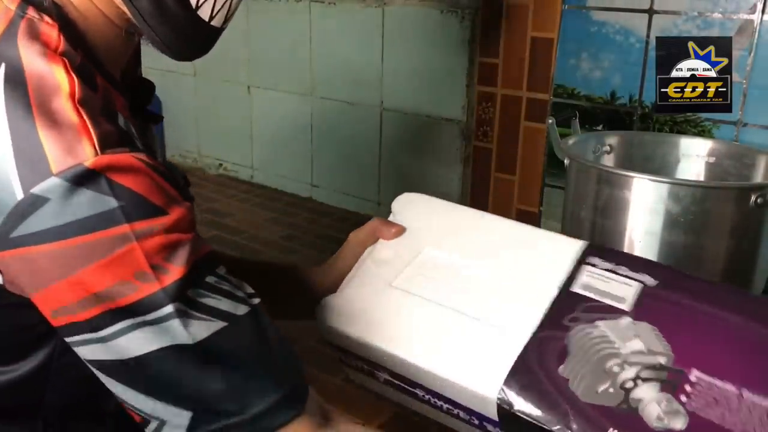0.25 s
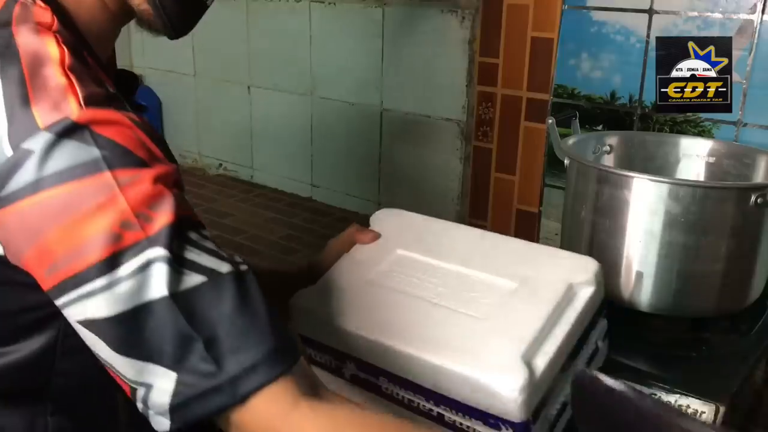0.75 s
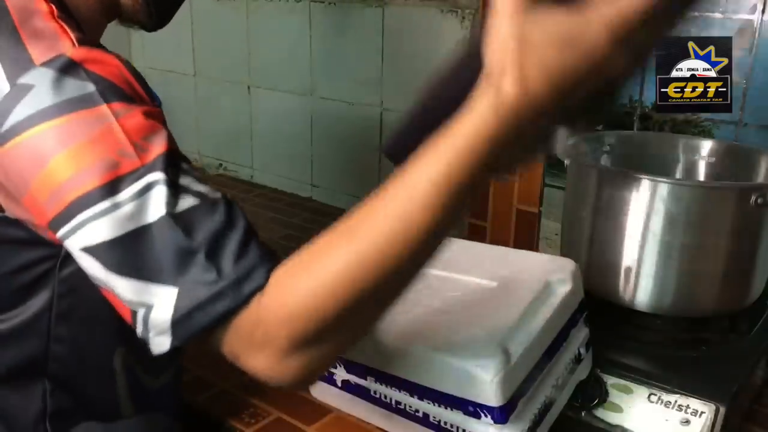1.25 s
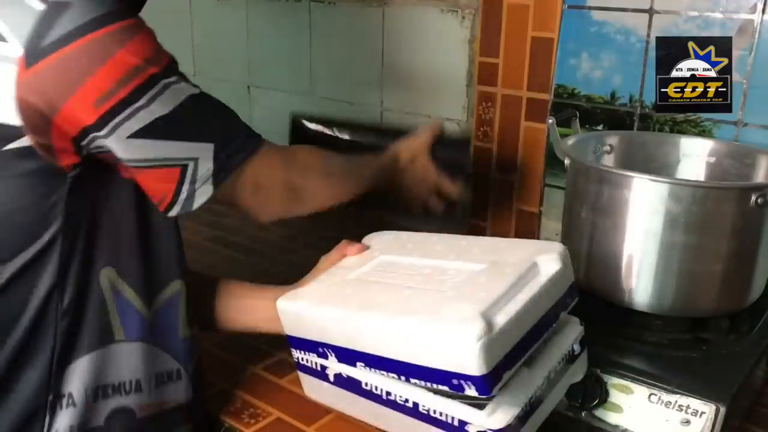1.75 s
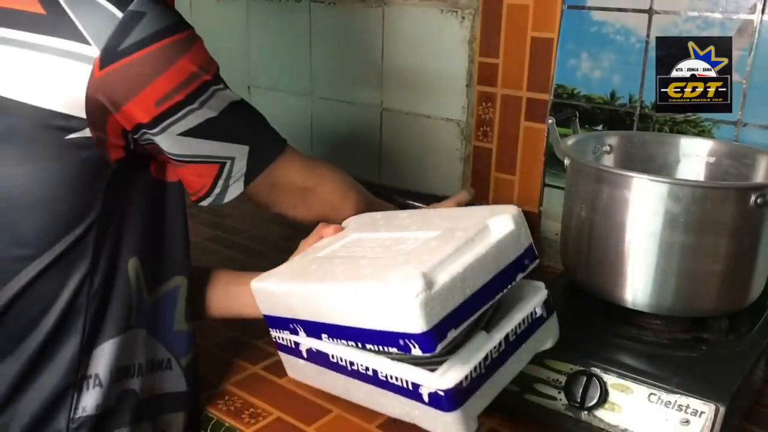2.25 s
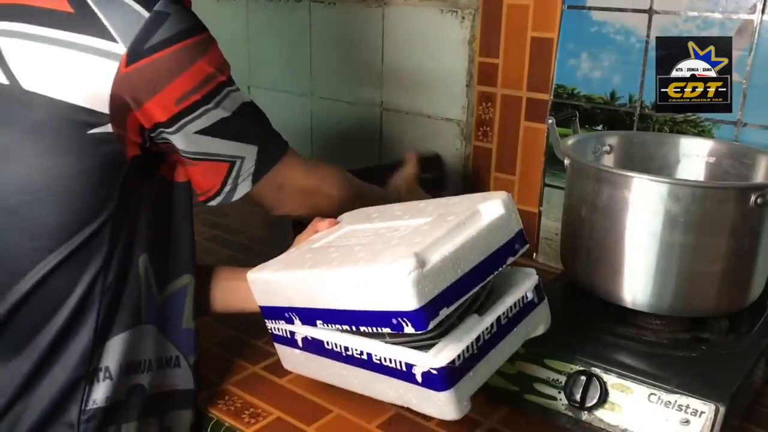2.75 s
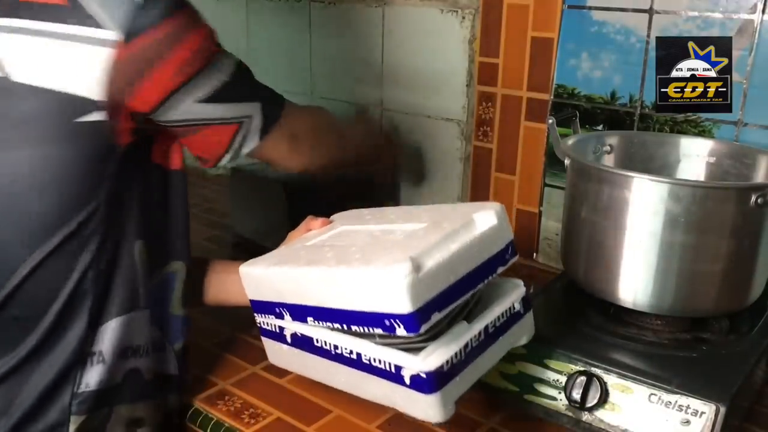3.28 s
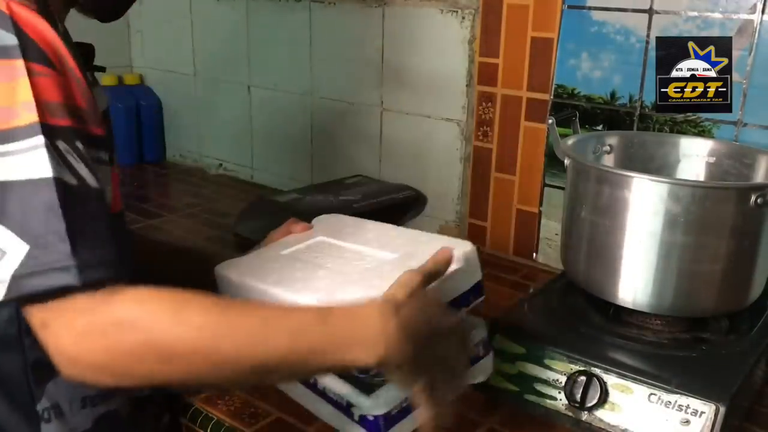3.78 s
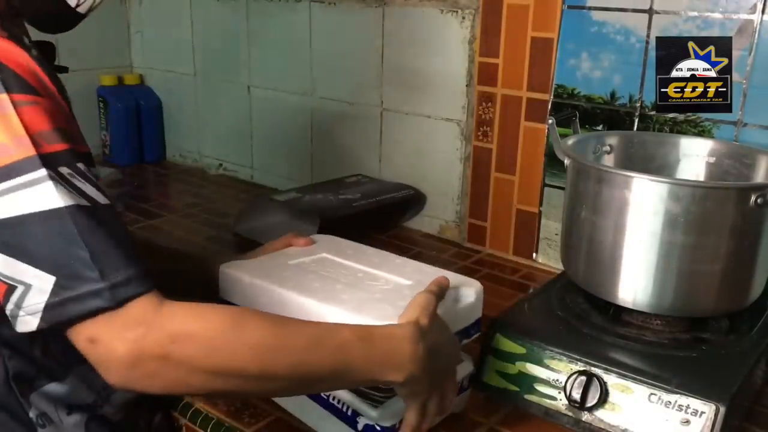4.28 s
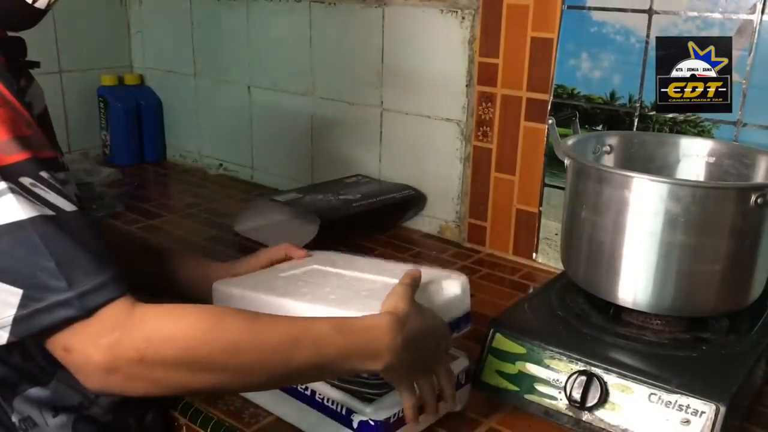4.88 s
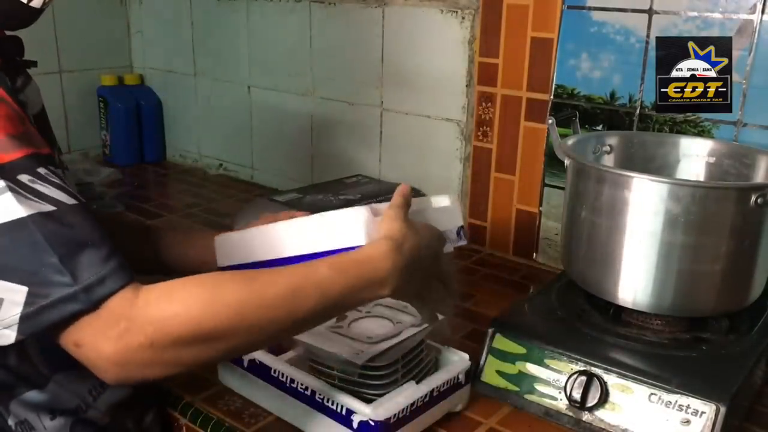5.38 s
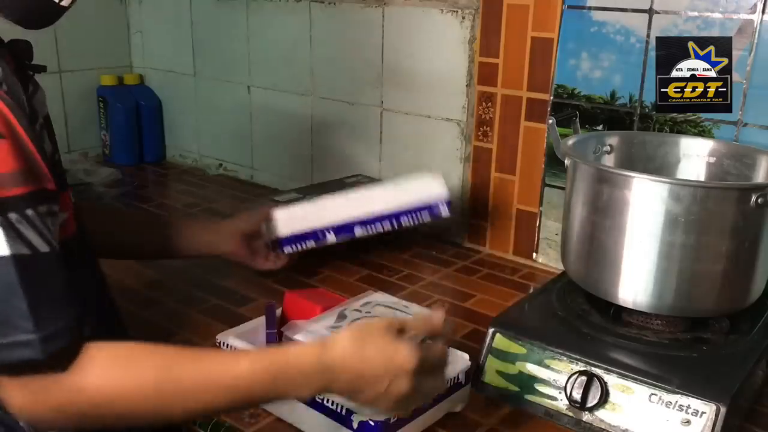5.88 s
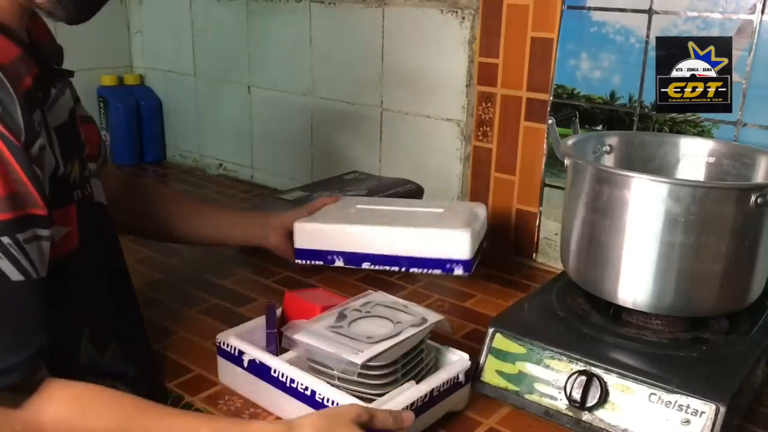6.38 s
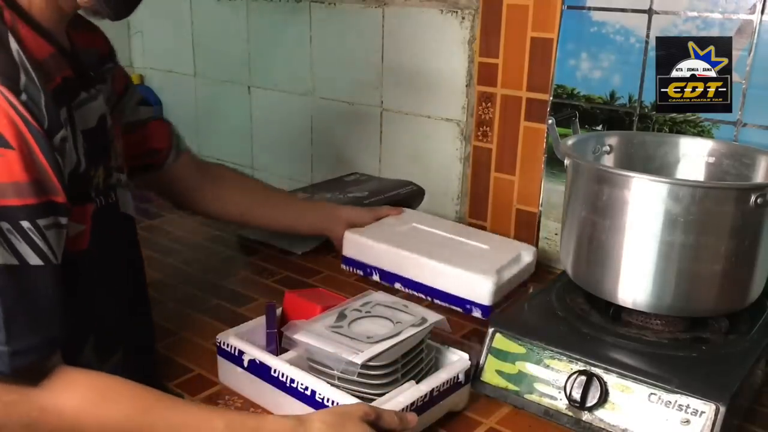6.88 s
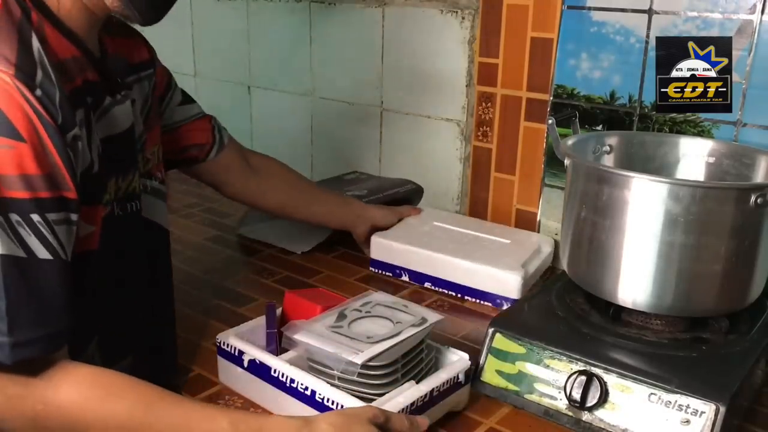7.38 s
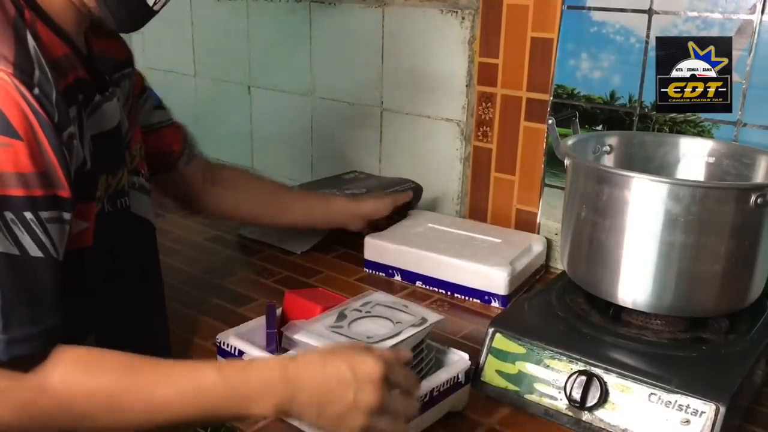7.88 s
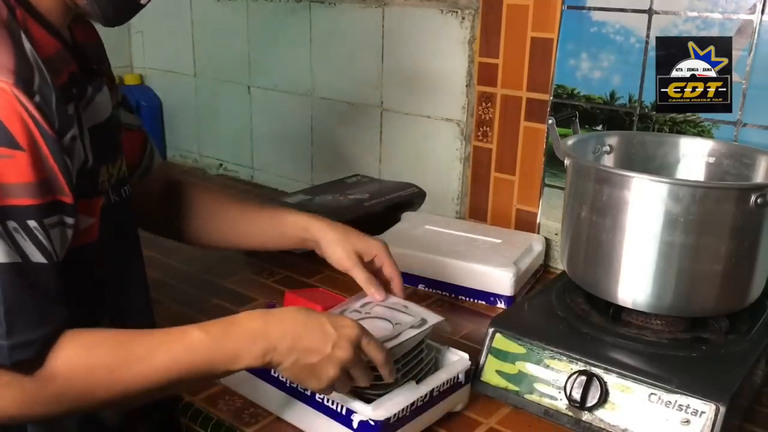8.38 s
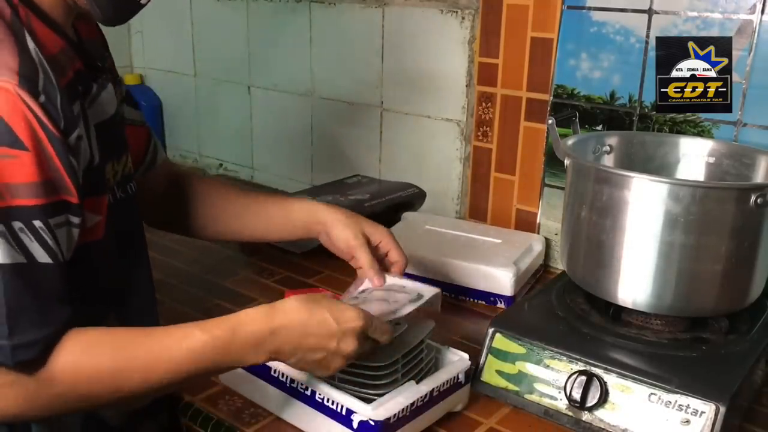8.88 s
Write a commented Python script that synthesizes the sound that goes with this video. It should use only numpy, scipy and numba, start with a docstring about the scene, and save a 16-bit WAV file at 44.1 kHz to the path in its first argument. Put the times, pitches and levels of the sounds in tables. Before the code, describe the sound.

In a quiet little kitchen, close to a phone, polystyrene rubs along card with fine hissing grit. Hollow knocks and low counter thumps follow as things are put down and shifted. Quick ticking creaks build into several hard, crisp cracks with squeaky foam rubbing, then a near lull. Later come scuffs, a few boxy knocks and faint handling rustle, with a short tiled reverberation.

```python
"""Foam box out of its sleeve

A foam box is drawn out of its card sleeve on a tiled counter; the sleeve is dropped, the taped lid worked loose and set down.
Noisy micro-slips, shaped by body, wall and hiss filters, make the sliding, rustling, cracks, snaps, scuffs and knocks.
Slow low noise and fading sine waves shake the counter; soft noise and faint tones fill a small quiet kitchen, heard by a phone."""
import sys
import numpy as np
from scipy import signal
from scipy.fft import rfft, irfft, next_fast_len
from scipy.io import wavfile
from scipy.ndimage import uniform_filter1d
from numba import njit

SR = 44100
rng = np.random.default_rng(int(sys.argv[2]) if len(sys.argv) > 2 else 0)


def store_pcm(level_fs):
    """Save levels as 16-bit WAV."""
    pcm = np.round(np.clip(level_fs, -1, 1) * 32767).astype(np.int16)
    wavfile.write(sys.argv[1], SR, np.atleast_2d(pcm).T)


N = 402879  # length in samples

# bending modes of the foam walls: (f/Hz, width/Hz, level/dB)
WALLS = [(972, 10, 2.5), (1200, 16, -3.5), (1450, 13, -7.5), (1770, 16, -7), (2070, 170, -9),
         (2472, 60, -4), (2920, 130, -5), (3430, 62, -3.5), (4067, 94, -6.5), (4520, 55, -2),
         (5840, 76, -3.5), (6820, 50, -3.5)]
# colour of the open hiss: (f/Hz, level/dB)
HISS = [(2940, -24.5), (5000, 0.5), (7060, -1.5), (8580, -5.5), (12100, -8.5), (14600, -17), (16000, -31)]
BRIGHT_HZ = (3490, 4680)  # broad bright band of the foam walls: centre, width


def sliding():
    """Foam slides on card: fine, even grit with little flicker."""
    # (t/s, wall level/dB, then against the wall: hollow body level/dB, hiss level/dB)
    slide = [(0.0, -37, -14, 3), (0.034, -55.5, -18, -0.5), (0.092, -72, 5, -1), (0.19, -70.5, -2, -9.5),
             (0.222, -53, -1, 3.5), (0.342, -46.5, -9, 0.5), (0.518, -44, -12, 3.5), (0.6, -40.5, -5.5, 3),
             (0.672, -54.5, -3, -5.5), (0.736, -50.5, 3.5, -16), (0.79, -68, -3, -15)]
    return rub(slide, body_hz=500, bright_db=1, grain_db=0.1, flicker_db=1.1, roam_db=3.0)


def rustling():
    """Hands and sleeves move over foam and card: coarser grit that flickers and roams more."""
    # (t/s, wall level/dB, then against the wall: hollow body level/dB, hiss level/dB)
    rustle = [(0.8, -64.5, -1, -37), (1.05, -71, 4.5, -23), (1.87, -72, 3, -11), (2.31, -80.5, -5, -7.5),
              (2.68, -77, 6.5, -9.5), (2.96, -67.5, 6, -11), (3.19, -69, 2, -3), (3.33, -50, -1.5, -22),
              (3.65, -71.5, 3, -13), (4.07, -69, -0.5, -5.5), (4.44, -50, -7, -14), (4.95, -51, -3.5, -7.5),
              (5.25, -73, -0.5, -12.5), (5.44, -78.5, -0.5, -9.5), (5.77, -69.5, -6, -11),
              (6.0, -82.5, -5.5, -2), (6.62, -71, 3.5, -13), (7.09, -64.5, 6, -8), (7.44, -72.5, 2.5, -4),
              (7.82, -62.5, 8, -10), (8.07, -80, 4, -11.5), (8.67, -71.5, 5.5, -11), (8.83, -81, 3.5, -9),
              (9.14, -79, -1.5, -3.5)]
    return rub(rustle, body_hz=480, bright_db=-4.5, grain_db=2.5, flicker_db=2.65, roam_db=6.5)


def tape_cracks():
    """The lid's tape lets go: very fast bursts with a strong tick and a sharp hiss."""
    # (t/s, wall level/dB, then against the wall: hollow body level/dB, bright level/dB, hiss level/dB;
    #  body f/Hz, t60/s, extra tick level/dB)
    cracks = [(4.4323, -17, -10, -0.5, -6.5, 495, .13, 5), (4.6195, -28.5, -4, 0.5, -6, 496, .29, -3),
              (4.6392, -18.5, -9, 2.5, -7.5, 666, 0.2, 12), (4.7545, -32, -5, 2.5, -2.5, 557, 0.15, -1),
              (4.784, -29, -10, 2, -4, 460, 0.095, 3)]
    return contacts(cracks, rise=0.0013, hold=0.016, spread=0.59, tick_db=1, tick_t60=0.02, blow=3.9,
                    grain_db=0.5, lead=0.27, late_s=0.004, linger=(0.9, 1.1, 0.9), touch_db=2.5,
                    wall_hz=1560, edge_db=5.5)


def knocks():
    """Hollow knocks: one sharp blow rings the body."""
    # (t/s, wall level/dB, then against the wall: hollow body level/dB, bright level/dB, hiss level/dB;
    #  body f/Hz, t60/s)
    table = [(0.7205, -42.5, 4.5, -17, -13, 240, 0.099), (1.1982, -64, -4, -9, -19, 510, 0.13),
             (1.262, -60, 5, -11, -17, 905, .083), (1.3838, -61.5, 4.5, -28, -41, 443, 0.083),
             (1.8774, -21.5, 3.5, -6.5, -45, 600, 0.089), (2.168, -67.5, 12, -1.5, -4.5, 800, 0.12),
             (2.2388, -64.5, 4.5, -27.5, -5.5, 277, 0.19), (3.2056, -39.5, 7.5, -4.5, -22, 533, 0.11),
             (4.2104, -47, -2, -9, -17, 309, 0.19), (5.0315, -37, -1.5, -9.5, -26, 600, .12),
             (5.699, -73.5, 11, -5, -8.5, 302, 0.12), (6.979, -46.5, 11, -7.5, -23, 598, 0.16),
             (7.2149, -54.5, 18, -27, -18, 483, 0.15), (7.6471, -40, 3.5, -26, -33.5, 435, .13),
             (7.7508, -55.5, 7, -7, -9, 498, 0.067), (7.7817, -31.5, 7, -34, -41, 358, 0.18),
             (7.8446, -39, 3.5, -32, -39, 499, 0.073), (8.2961, -73.5, 12, -16.5, -22, 406, .087)]
    return contacts(table, rise=0.003, hold=0.072, spread=1.1, tick_db=-3, tick_t60=0.026, blow=16,
                    grain_db=2.0, lead=0.44, late_s=0.0016, linger=(1.2, 0.9, 0.8), touch_db=1.5,
                    wall_hz=1230, edge_db=-1.2)


def snaps():
    """Small dry snaps: short ticks on a body of fixed pitch and decay."""
    # (t/s, wall level/dB, then against the wall: hollow body level/dB, bright level/dB)
    table = [(0.693, -44, -8, -2), (1.1414, -63, -2, -16), (1.3098, -64, -14, -3.5),
             (1.3522, -67, 10.5, -13), (1.4815, -61.5, -7, -13.5), (1.594, -57, -15, -5.5),
             (1.6517, -57, 2.5, -1), (1.8114, -60, 2.5, -11.5), (2.8104, -48.5, -5, -5),
             (2.9559, -64, 3, -12), (3.095, -59.5, 4.5, -16), (3.1568, -38.5, 1.5, -0.5),
             (3.247, -36, -5.5, -4), (3.2983, -46, -4, 6), (3.456, -51.5, -23, -5),
             (3.5392, -45.5, -16, -7), (3.5613, -61, -15, -21), (3.696, -64, -6, -4.5),
             (3.7717, -80, 1, -11), (3.86, -53.5, -2, -6), (3.933, -51, -2.5, 1), (3.9583, -49.5, -8.5, -3),
             (4.0033, -50.5, -6, -3.5), (4.0532, -48.5, -13.5, -5), (4.0878, -58, -15.5, -5),
             (4.1128, -49, -14.5, -1), (4.132, -46.5, -12.5, -5), (4.1507, -51.5, 0, -0.5),
             (4.1837, -51, -11, -4), (4.1982, -49, 3.5, -8), (4.3208, -54.5, -3.5, 1),
             (4.3791, -36.5, -4.5, 1.5), (5.7963, -51.5, -11.5, -10), (5.8482, -58, -10.5, -13.5),
             (6.1647, -70.5, -6, 4), (6.4393, -51.5, -5.5, -0.5), (7.078, -39.5, -2, -3),
             (7.575, -46, 7.5, -1.5), (7.981, -44.5, 0.5, -2), (8.818, -67, 3, 3.5)]
    hiss_below_bright_db, body_hz, t60_s = -8, 500, 0.087
    rows = [(s, db, body_db, bright_db, bright_db + hiss_below_bright_db, body_hz, t60_s)
            for s, db, body_db, bright_db in table]
    return contacts(rows, rise=0.0021, hold=0.024, spread=0.9, tick_db=2.0, tick_t60=0.0088, blow=5.6,
                    grain_db=2.4, lead=0.3, late_s=0.002, linger=(0.9, 1.1, 0.9), touch_db=1.0,
                    wall_hz=1480, edge_db=0.4)


def scuffs():
    """Soft scuffs: bursts that swell slowly, with hardly any tick."""
    # (t/s, wall level/dB, then against the wall: hollow body level/dB, bright level/dB, hiss level/dB;
    #  body f/Hz, t60/s)
    table = [(0.3129, -45, 0.5, 0, 3.5, 500, 0.12), (0.5778, -39.5, -3.5, -22, 12, 534, 0.1),
             (0.6068, -42, -27, -2, 8.5, 552, 0.045), (0.6903, -41.5, 0, 4.5, -19, 730, 0.052),
             (1.6941, -54, 1.5, -17, -24, 490, 0.078), (1.72, -61, -6, -23, -24, 415, 0.092),
             (1.745, -53, -2, -8, -17, 514, 0.063), (1.772, -57, -2, -18, -22, 528, 0.032),
             (2.0384, -58, 7, -11, -21, 594, .089), (3.2805, -43.5, 1.5, -19, -10.5, 540, 0.078),
             (3.3227, -49.5, 1.5, -9, -13, 250, 0.078), (4.3797, -33.5, -6, 2, -3.5, 810, 0.084),
             (4.418, -39.5, -0.5, -4, -8, 600, 0.074), (4.5794, -46.5, 0.5, 1, -7, 885, .11),
             (4.9034, -48, -5, 5, -3, 533, 0.31), (4.9461, -40, -17, 0.5, -10.5, 535, 0.069),
             (5.0494, -51, 1, -1, -3.5, 600, 0.089), (5.1191, -50.5, -3.5, -3, -7, 440, 0.17),
             (5.1801, -47.5, 1.5, -1.5, -8.5, 747, 0.09), (5.4774, -66, -11, 0.5, -35, 570, 0.15),
             (5.5472, -65.5, -13.5, 3, -4.5, 266, 0.39), (5.6068, -64, -16, -6, -18.5, 700, .071),
             (5.7649, -65.5, 0, 4, -7.5, 250, 0.11), (5.9327, -64, -3, -0.5, -4.5, 538, 0.18),
             (6.2302, -72.5, -4, 1, -13.5, 264, 0.14), (6.2978, -73, -12, 2, -9.5, 321, 0.077),
             (6.6094, -68, -5, -31.5, -4, 450, 0.11), (6.7628, -60, 1.5, -2, -5.5, 707, 0.043),
             (6.9, -60, -1, -7, -12.5, 525, .15), (6.94, -54, -9, -4, -10, 525, 0.084),
             (6.9974, -53, 12, -16, -8, 450, .077), (7.062, -51, -12, 5, 7, 600, 0.067),
             (7.083, -38, -1.5, -5, -5.5, 567, 0.16), (7.0999, -33, -4.5, -8, -11, 580, .077),
             (7.2381, -50.5, -1, -35, -18, 480, 0.058), (7.332, -57.5, 9, -20, -15, 620, 0.12),
             (7.3522, -39, 4.5, -2.5, -12.5, 690, 0.089), (7.5717, -42.5, -1, -5, -6.5, 406, 0.094),
             (7.9794, -40, 2, -16, -3, 490, 0.058), (8.04, -60, 2, -23, -3.5, 374, 0.076),
             (8.3547, -69.5, 8, -18, -13, 382, 0.15), (8.7491, -66, -12, -8, -7, 657, 0.15),
             (8.7949, -70, 2.5, 7, -9.5, 540, 0.14)]
    return contacts(table, rise=0.021, hold=0.049, spread=0.93, tick_db=-13, tick_t60=0.015, blow=1.2,
                    grain_db=1.5, lead=0.52, late_s=0.004, linger=(0.9, 1.1, 1.1), touch_db=0.5,
                    wall_hz=1450, edge_db=1.4)


def rub(table, body_hz, bright_db, grain_db, flicker_db, roam_db):
    """Steady friction: grit through the body, the walls and open hiss, each flickering; the touch roams."""
    wall_db, body_db, hiss_db = curve(table)
    parts = (band(grit(N, grain_db), body_hz, 610),
             band(grit(N, grain_db), 1530, 2600),  # the walls
             band(grit(N, grain_db), *BRIGHT_HZ),
             colour(grit(N, grain_db), HISS))
    gains_db = (body_db, 0, bright_db, hiss_db)
    mix = sum(unit(part) * undb(db + flicker_db * walk(30)) for part, db in zip(parts, gains_db))
    mix = mix * undb(wall_db + flicker_db * walk(12))
    touch_db = [roam_db * walk(28) - 9 for _ in WALLS]
    return walls(mix, touch_db)


def contacts(table, rise, hold, spread, tick_db, tick_t60, blow, grain_db, lead, late_s, linger,
             touch_db, wall_hz, edge_db):
    """Each contact: a burst of slips that swells, holds a share of its decay and dies, with a tick; lows come late.

    rise, tick_t60, late_s in s; lead as a share of the rise; spread in octaves;
    linger scales the decay of body, bright and hiss; edge_db tilts the hiss per octave.
    """
    out = np.zeros(N + SR)
    t = np.arange(SR // 4) / SR
    hiss = [(hz, db + edge_db * np.log2(hz / 5000)) for hz, db in HISS]
    lateness = (0.9, 0.29, 0, 0)  # body, wall, bright, hiss
    decay_shares = (linger[0], 1, linger[1], linger[2])
    for s, wall_db, body_db, bright_db, hiss_db, body_hz, t60, *extra_tick_db in table:
        full_tick_db = tick_db + sum(extra_tick_db)
        pushes = []
        for late, share in zip(lateness, decay_shares):
            top = rise + late_s * late
            swell = np.sin(np.pi / 2 * np.minimum(t / top, 1)) ** 2
            fall = undb(-60 * np.maximum(t - top - hold * t60, 0) / (t60 * share))
            tick = undb(full_tick_db - 60 * np.maximum(t - top, 0) / tick_t60)
            push = swell * (fall + tick) * grit(len(t), grain_db)
            # one sharp blow, halfway up the swell, sets the modes ringing
            push[int(top * SR / 2)] += blow * undb(full_tick_db)
            pushes.append(push)
        parts = (hollow(pushes[0], body_hz, spread, 0.13),
                 band(pushes[1], wall_hz, 1.6 * wall_hz),
                 band(pushes[2], *BRIGHT_HZ),
                 colour(pushes[3], hiss))
        gains = undb(wall_db + np.array([body_db, 0, bright_db, hiss_db]))
        # each part is scaled by the strength of its loudest 9 ms
        body, *upper = (gain * part / np.sqrt(uniform_filter1d(part ** 2, size=400).max())
                        for part, gain in zip(parts, gains))
        start = int((s - lead * rise) * SR)
        random_touch_db = touch_db * rng.standard_normal(len(WALLS))
        out[start:start + len(t)] += body + walls(sum(upper), random_touch_db)
    return out[:N]


def grit(n, grain_db):
    """Dense micro-slips of foam beads, a few stronger than the rest."""
    strength_db = grain_db * np.minimum(rng.exponential(size=n), 5)
    return unit(rng.standard_normal(n) * undb(strength_db))


def hollow(x, hz, spread, plain_db):
    """Cavities within spread octaves of hz answer most, over a broad unresonant band."""
    # box and lid cavities: (f/Hz, width/Hz, level/dB)
    cavities = [(202.5, 180, -1), (321.2, 75, 4), (429, 36, -5.5), (490, 89, 4), (590.7, 60, 0),
                (695, 60, 4.5), (740, 86, 0.5)]
    out = undb(plain_db) * band(x, hz, 1.3 * spread * hz)
    for k, (f, width, db) in enumerate(cavities):
        near_db = db - 17.0 * (np.log2(f / hz) / spread) ** 2
        sign = (-1) ** k
        out = out + sign * undb(near_db) * svf(x, 1.0 * f, 1.0 * width)
    return out


def walls(x, touch_db):
    """Adds the wall modes, each as strong as the place of the touch lets it be."""
    return x + sum(undb(db + touch) * svf(x, 1.0 * f, 1.0 * width)
                   for (f, width, db), touch in zip(WALLS, touch_db))


def counter():
    """Low noise trembles unevenly, with jolts that rise fast and die slower; damped sine rings add thumps and knock bodies."""
    # uneven low tremble that rises and falls with the handling, ahead of a shared 3 dB cut: (t/s, level/dB)
    tremble = [(0.0, -39), (0.1, -61.5), (0.27, -51), (0.45, -42.5), (0.62, -46), (0.8, -52), (1.3, -58),
               (1.65, -51), (2.05, -45.5), (2.15, -68), (3.03, -56.5), (3.4, -44.5), (3.75, -55),
               (4.3, -54.5), (4.75, -46), (5.1, -57.5), (5.37, -66), (5.7, -56.5), (6.1, -66.5), (6.9, -60),
               (7.5, -61.5), (8.14, -66), (8.4, -51), (8.7, -68.5), (9.14, -66)]
    # moments of harder shaking, ahead of the same cut: (peak t/s, peak level/dB)
    jolts = [(0.249, -41), (0.58, -46), (0.73, -42), (0.89, -45.5), (0.99, -47.5), (1.19, -42.5),
             (1.729, -36), (1.882, -34.5), (2.06, -51), (2.19, -54.5), (3.181, -38), (3.23, -31),
             (3.33, -32.5), (3.56, -39), (3.79, -49), (4.15, -51), (4.45, -39), (4.6, -41), (4.78, -53),
             (4.93, -41), (5.19, -47.5), (5.77, -46), (6.6, -55), (7.0, -45.5), (7.07, -38), (7.38, -51),
             (7.58, -50.5), (7.81, -45), (7.99, -41), (8.06, -47), (8.73, -61.5)]
    # damped sine rings, some sounding together as the body of a knock:
    # (t/s, level before decay/dB, f/Hz, t60/s)
    rings = [(.719, -35, 160, 0.074), (1.72, -38, 50, 0.17), (1.879, -20.5, 286, .1),
             (1.8775, -20.5, 690, 0.064), (1.879, -31, 129.4, .1), (2.167, -43, 704, 0.053),
             (3.146, -20, 90.5, 0.096), (3.322, -18, 79, 0.066), (4.115, -29, 59.4, 0.12),
             (4.21, -31, 319, 0.058), (5.658, -44.5, 110, .08), (7.783, -22, 331, 0.16),
             (7.7835, -35.5, 684, .1), (8.032, -39, 90, 0.07), (8.296, -49.5, 200, 0.069)]
    jolt_rise_db_per_s, jolt_fall_db_per_s, ring_rise_cycles = 501, 219.5, 0.63
    t = np.arange(N) / SR
    low = unit(svf(rng.standard_normal(N), 39.0, 25.0))
    low = low + undb(-9.5) * unit(svf(rng.standard_normal(N), 55.0, 99.0))
    shake_db = curve(tremble)[0]
    for s, db in jolts:
        drop_db = np.maximum(jolt_rise_db_per_s * (s - t), jolt_fall_db_per_s * (t - s))
        shake_db = np.maximum(shake_db, db - drop_db)
    out = unit(low) * undb(shake_db - 3.0 + 2.2 * walk(11))
    for s, db, hz, t60 in rings:
        age = np.maximum(t - s, 0)
        rise = np.minimum(age * hz / ring_rise_cycles, 1)
        out = out + rise * undb(db - 60 * age / t60) * np.sin(2 * np.pi * hz * age)
    return out


def room(x):
    """Tiles answer with a short dense tail of fading noise; its faint treble has its own decay."""
    t60_s, treble_t60_s, tail_db = 0.34, 0.6, -16
    t = np.arange(SR // 2) / SR
    noise = rng.standard_normal(len(t)) * np.minimum(t / 0.0015, 1)
    low = svf(noise, 1100.0, 2800.0)
    treble = noise - low
    tail = low * undb(-60 * t / t60_s) + treble * undb(-60 * t / treble_t60_s - 12.0)
    tail = undb(tail_db) * tail / np.sqrt(np.sum(tail ** 2))
    return signal.fftconvolve(x, tail)[:N]


def kitchen():
    """Quiet air as coloured noise, a faint wavering trill as narrow noise, and thin far-off sine tones."""
    # colour of the quiet air: (f/Hz, level/dB)
    quiet = [(59, -30), (100, -5), (150, -5), (910, -21.5), (1150, -3), (1310, -20), (3780, -25.5),
             (4470, -17.5), (4770, -18), (5300, -12), (16000, -11.5)]
    # faint tones from far off: (start t/s, end t/s, f/Hz, peak level/dB)
    tones = [(8.645, 8.69, 4010, -78), (8.65, 8.71, 5950, -82), (8.925, 9.14, 1179, -80),
             (9.04, 9.1, 6600, -78)]
    trill_hz, trill_db, quiet_db = 5340.0, -93, -77
    t = np.arange(N) / SR
    trill = unit(svf(rng.standard_normal(N), trill_hz, 60.0)) * undb(trill_db + 2.2 * walk(9))
    air = unit(colour(rng.standard_normal(N), quiet)) * undb(quiet_db + 0.6 * walk(5))
    out = trill + air
    for start, end, hz, db in tones:
        fade = np.clip(np.minimum(t - start, end - t) / 0.014, 0, 1)
        out = out + fade * undb(db) * np.sin(2 * np.pi * hz * t)
    return out


def undb(db):
    """Turns decibels into a plain factor."""
    return 10 ** (np.asarray(db) / 20)


def unit(x):
    """Scales a signal to an average (RMS) strength of 1."""
    return x / np.sqrt(np.mean(x ** 2) + 1e-30)


@njit
def svf(x, hz, width):
    """One resonance: a state-variable band-pass, gain 1 at the centre."""
    y = np.empty(len(x))
    b, l = 0., 0.  # band and low states
    g, k = np.tan(np.pi * hz / SR), width / hz
    for i in range(len(x)):
        v = (b + g * (x[i] + 1e-18 - l)) / (1 + g * (g + k))
        b, l, y[i] = 2 * v - b, l + 2 * g * v, k * v
    return y


def band(x, hz, width):
    """A resonance applied three times, for steep skirts."""
    for _ in range(3):
        x = svf(x, 1.0 * hz, 1.0 * width)
    return x


def colour(x, points):
    """Shapes the spectrum by (Hz, dB) points."""
    n = next_fast_len(len(x))
    hz, db = np.transpose(points)
    f = np.maximum(np.arange(n // 2 + 1) * SR / n, 1)
    gain = undb(np.interp(np.log(f), np.log(hz), db))
    return irfft(rfft(x, n) * gain, n)[:len(x)]


def walk(rate):
    """Random wandering: levels held 1 / rate s, smoothed twice."""
    k = int(SR / rate)
    steps = np.repeat(rng.standard_normal(N // k + 1), k)
    return unit(uniform_filter1d(uniform_filter1d(steps, k), k)[:N])


def curve(table):
    """Columns of a table at every sample; outside its span the first one falls by 400 dB per second."""
    s, *columns = np.transpose(table)
    t = np.arange(N) / SR
    curves = [np.interp(t, s, column) for column in columns]
    outside_s = np.maximum(np.maximum(s[0] - t, t - s[-1]), 0)
    curves[0] = curves[0] - 400 * outside_s
    return curves


def scene():
    """Contacts and rubbing sound in the room; counter and air come direct."""
    foam = sliding() + rustling() + tape_cracks() + knocks() + snaps() + scuffs()
    return (foam + room(foam) + counter() + kitchen())[None]


def record(dry):
    """The phone rounds the loudest peaks and cuts the top."""
    top_hz = 15900
    rounded = 1.1 * np.tanh(dry / 1.1)
    low_pass = signal.ellip(10, 0.2, 60, top_hz, fs=SR, output="sos")
    return signal.sosfilt(low_pass, rounded)


dry = scene()
out = record(dry)
store_pcm(out)
```